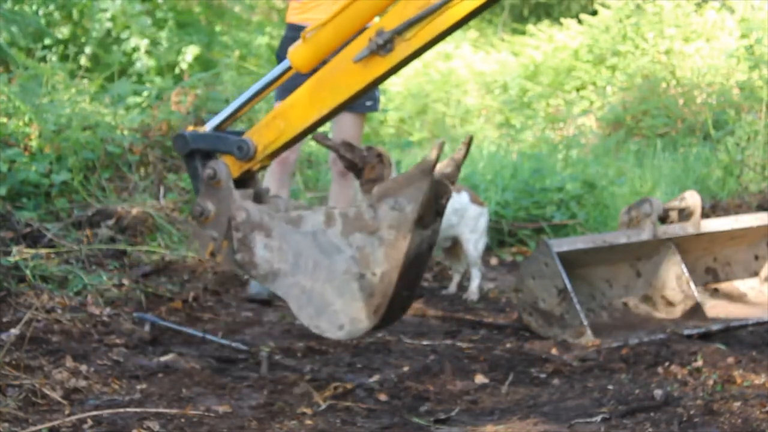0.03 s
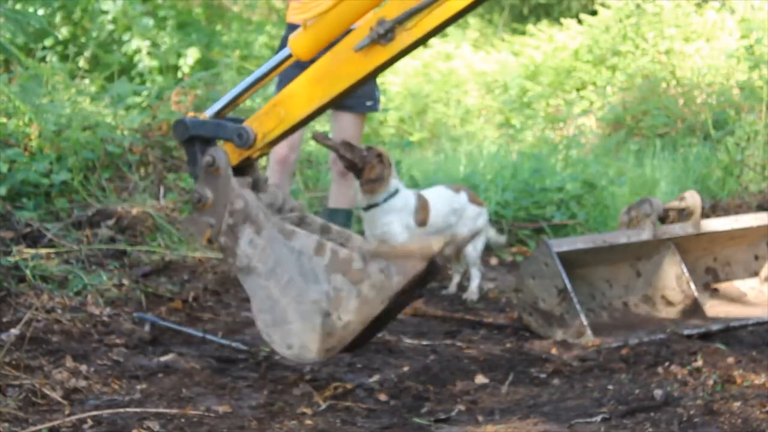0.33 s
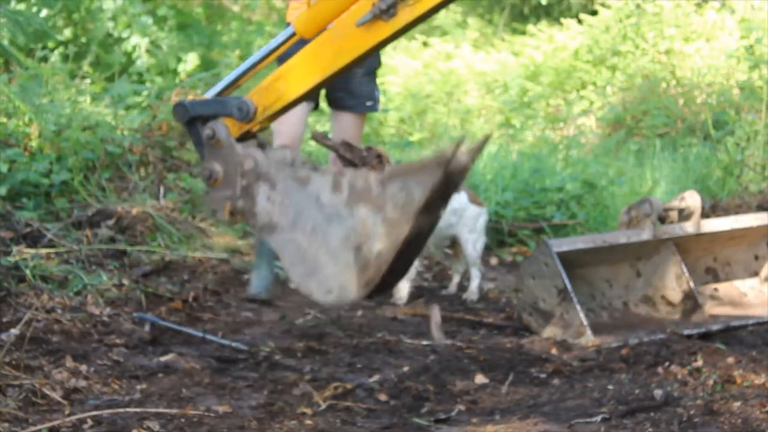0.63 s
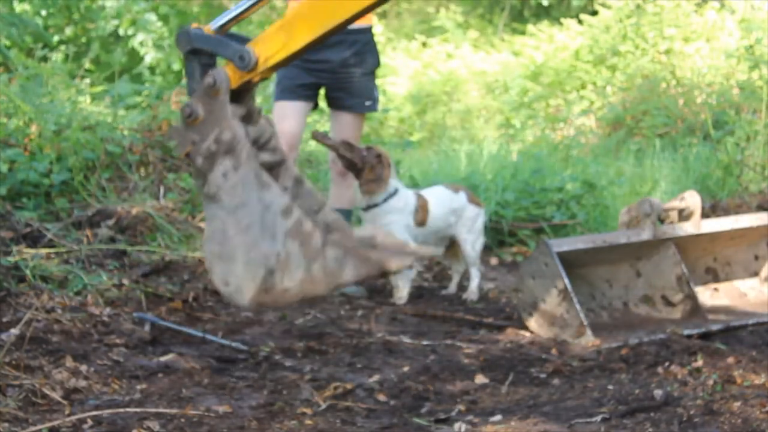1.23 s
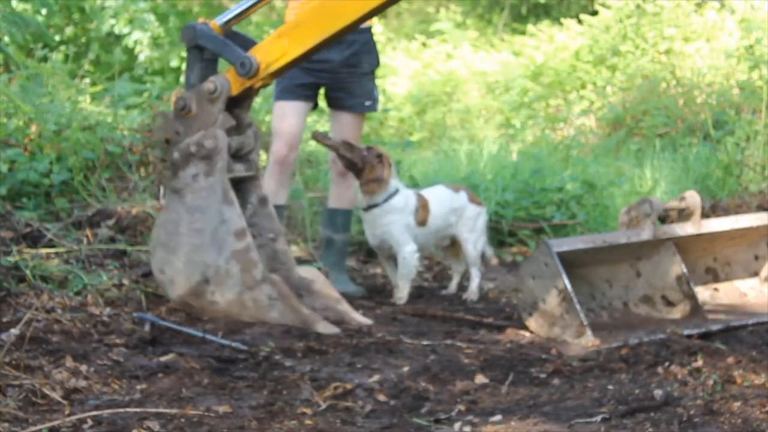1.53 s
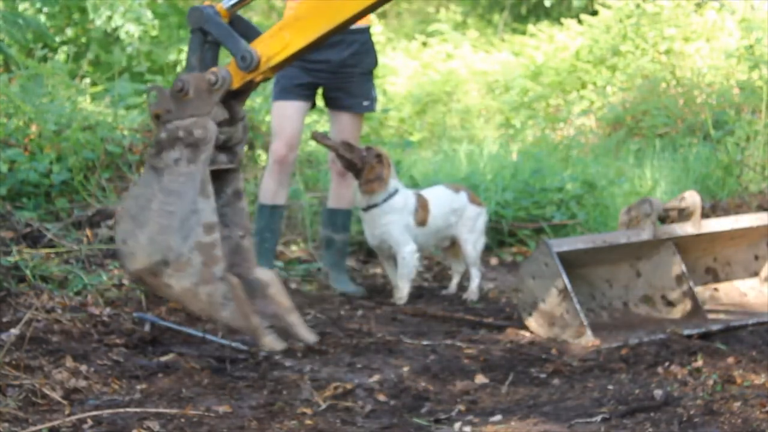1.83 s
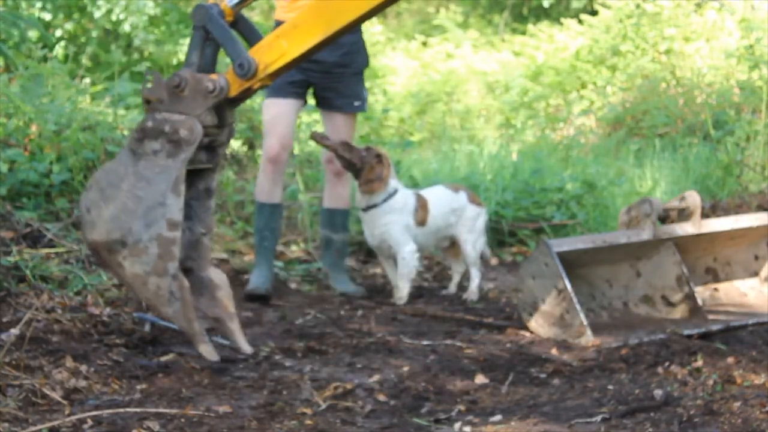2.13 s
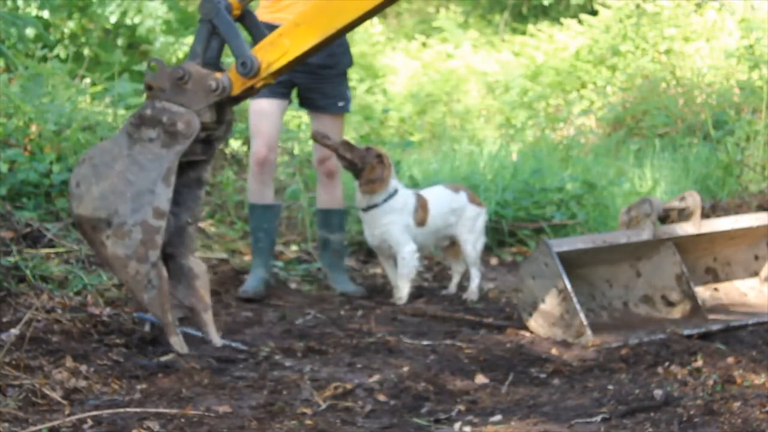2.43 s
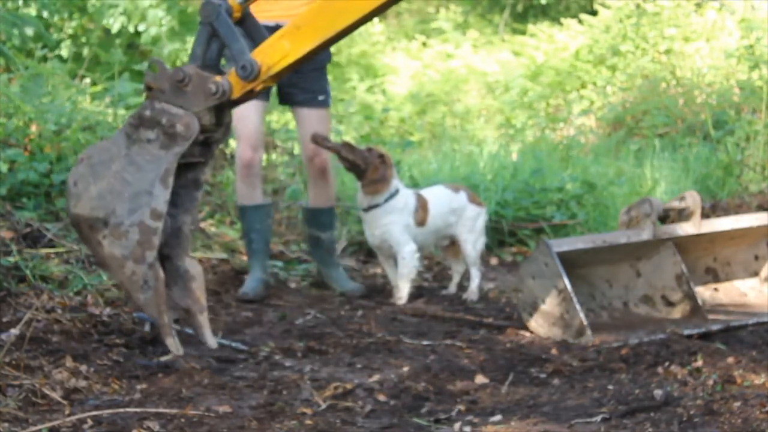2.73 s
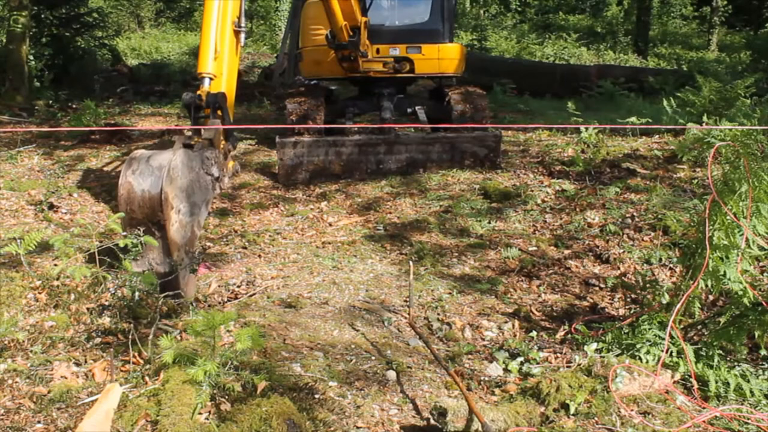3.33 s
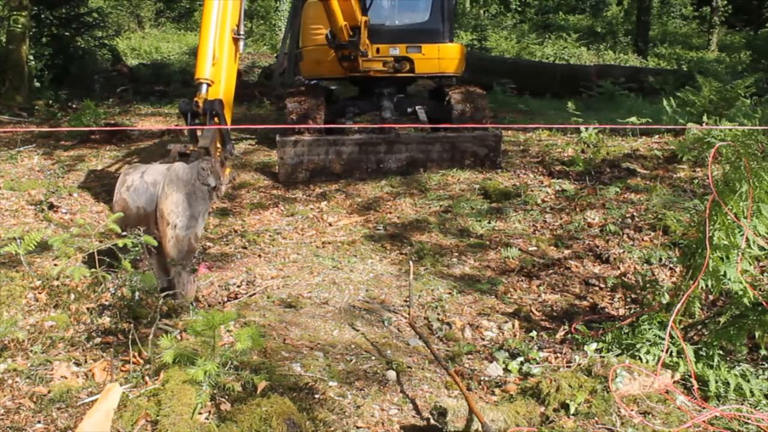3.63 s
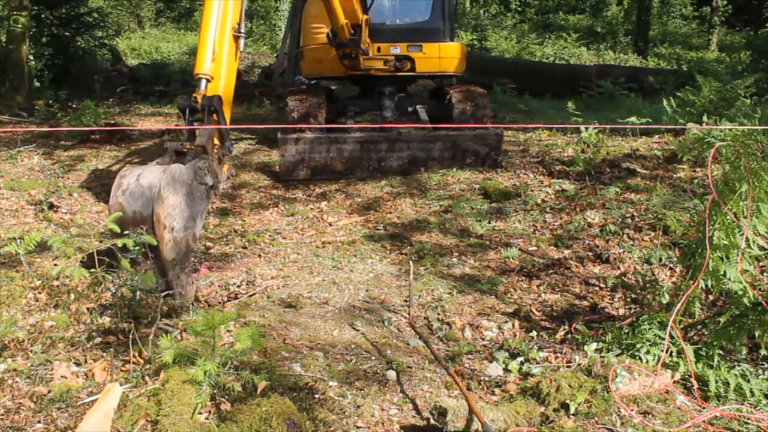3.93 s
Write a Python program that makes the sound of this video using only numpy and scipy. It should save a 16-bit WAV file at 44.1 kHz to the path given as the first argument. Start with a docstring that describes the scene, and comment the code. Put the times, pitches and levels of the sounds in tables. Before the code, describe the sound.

A steel excavator bucket clanks, rattles and rings close by for the first 1.7 seconds, with a sharp ping near 0.3 and the hardest bang near 0.5. A diesel engine idles throughout. A twig snaps around 1.9 seconds, and faint birds whistle from 2.4. Just before 3 seconds the sound dips briefly, then the engine clatters more brightly while twigs snap and dry leaves crackle until 4 seconds.

```python
"""An excavator in a wood, the microphone beside its steel bucket, the three-cylinder diesel idling throughout.
For the first second and a half or so the bucket is shaken: the joints chatter, a pin pings, the loose linkage
clanks and the shell rings. A twig snaps, and from 2.4 s small birds whistle far off. Just before 3 s the sound
dips briefly and the scene changes to the front of the machine, with brighter engine clatter and twigs and dry
leaves crackling under the bucket."""
import sys
import numpy as np
from scipy import signal
from scipy.fft import rfft, irfft, next_fast_len
from scipy.io import wavfile
from scipy.ndimage import uniform_filter1d

SR = 44100
rng = np.random.default_rng(int(sys.argv[2]) if len(sys.argv) > 2 else 0)


def master_out(mix):
    """Clip the mix to full scale and print it as 16-bit PCM to the path in sys.argv[1]."""
    frames = np.transpose(np.atleast_2d(mix))
    ceiling = np.clip(frames, -1, 1)
    pcm = np.round(ceiling * 32767).astype(np.int16)
    wavfile.write(sys.argv[1], SR, pcm)


N = 176400
T = np.arange(N) / SR

# Colour of steel striking steel. Each row: frequency in Hz, level in dB.
STEEL_CONTACT = [(120, -18.5), (300, 0.5), (700, -4), (1300, 1), (2200, -0.5), (3300, 0), (5000, -8),
                 (7000, -9), (10000, -25.5), (16000, -38)]


def amp(db):
    """Decibels to gain."""
    return 10 ** (np.asarray(db) / 20)


def unit(x):
    """Scale to rms 1."""
    return x / np.sqrt(np.mean(x ** 2) + 1e-20)


def along(points, hz):
    """Read (Hz, value) points on a log frequency axis."""
    f, v = np.transpose(points)
    return np.interp(np.log(hz + 1), np.log(f + 1), v)


def filtered(x, gain):
    """Apply a gain that depends on frequency."""
    m = next_fast_len(len(x) + 8192)
    return irfft(rfft(x, m) * gain(np.fft.rfftfreq(m, 1 / SR)), m)[:len(x)]


def shelf(hz, treble_db, corner_hz=2570):
    """Treble gain: harder contacts carry more of it."""
    return amp(treble_db * hz ** 4 / (hz ** 4 + corner_hz ** 4))


def near(hz, part_hz, octaves=0.2):
    """1 at the pitch of the struck part, 0 far from it."""
    return np.exp(-(np.log2((hz + 1) / part_hz) / octaves) ** 2)


def noise(spectrum, size, treble_db=0, partials_db=0, spacing_hz=20, part_hz=1000, part_db=0):
    """Coloured noise of rms 1, gathered into random partials and lifted around one pitch."""
    knots = partials_db * np.clip(rng.standard_normal(8192), -2.2, 2.2)
    m = next_fast_len(size)
    hz = np.fft.rfftfreq(m, 1 / SR)
    partials = np.interp(hz / spacing_hz, np.arange(len(knots)), knots)
    gain = amp(along(spectrum, hz) + partials + part_db * near(hz, part_hz)) * shelf(hz, treble_db)
    return unit(irfft(rfft(rng.standard_normal(m)) * gain, m)[:size])


def pulse(spectrum, size=8192):
    """Minimum-phase pulse with this spectrum."""
    cepstrum = irfft(np.log(amp(along(spectrum, np.fft.rfftfreq(size, 1 / SR)))))
    cepstrum[1:size // 2] *= 2
    cepstrum[size // 2:] = 0
    return irfft(np.exp(rfft(cepstrum)))


def fade(t, t60):
    """Decay by 60 dB in t60 seconds."""
    return np.exp(-np.log(1000) * t / t60)


def struck(t, t60=np.inf, attack_s=0.00024):
    """Quick rise, then a decay if t60 is given."""
    return (1 - np.exp(-(t / attack_s) ** 2)) * fade(t, t60)


def add(out, s, x):
    """Mix x into out from time s."""
    part = out[max(0, round(s * SR)):][:len(x)]
    part += x[:len(part)]


def ring(modes, t, scatter_db=2):
    """Decaying modes, a little different at each strike."""
    return sum(amp(db + scatter_db * rng.normal()) * fade(t, t60)
               * np.sin(2 * np.pi * (hz * t + rng.random())) for hz, db, t60 in modes)


def grains(per_s, t60, spread_db):
    """Envelope of many small random contacts, rms 1."""
    hits = (rng.random(N) < per_s / SR) * amp(spread_db * np.clip(rng.standard_normal(N), -2, 2))
    power = signal.fftconvolve(hits ** 2, fade(T[:SR // 10], t60) ** 2)[:N]
    return unit(np.sqrt(np.abs(power)))


def diesel(rate, firing_s, exhaust, clatter, exhaust_db, clatter_db, knock, knock_t60, rumble):
    """Each firing sends out an exhaust pulse and swells the mechanical noise; one falls at firing_s."""
    # Relative strength of each of the three cylinders in dB.
    cylinders_db = [-.6, 1.2, -.6]
    firings = np.cumsum(np.interp(T, *np.transpose(rate))) / SR
    stroke = np.floor(firings - np.interp(firing_s, T, firings)).astype(int)
    at = np.flatnonzero(np.diff(stroke)) + 1
    fire = np.zeros(N)
    fire[at] = amp(np.take(cylinders_db, stroke[at], mode="wrap") + .5 * rng.standard_normal(len(at)))
    thud = unit(signal.fftconvolve(fire, pulse(exhaust))[:N])
    t = T[:SR // 3]
    swell = unit(signal.fftconvolve(fire, np.minimum(t * 1000, 1) * fade(t, knock_t60))[:N])
    rattle = noise(clatter, N) * (1 + knock * swell)
    # rumble is the gain left well below 150 Hz
    rattle = filtered(rattle, lambda hz: rumble + (1 - rumble) * hz ** 6 / (hz ** 6 + 150 ** 6))
    return amp(exhaust_db) * thud + amp(clatter_db) * unit(rattle)


def engine_beside():
    """The idle from beside the bucket: exhaust throb over nearly even clatter."""
    # Each row: time in seconds, firing rate in Hz.
    rate = [(0, 36.53), (.6, 33.24), (.95, 34.15), (1.35, 35.81), (2.1, 34.9), (2.5, 35.98), (2.9, 37.38)]
    # Colours of the exhaust pulse and the clatter. Each row: frequency in Hz, level in dB.
    exhaust = [(20, -40), (36, -36), (52, -6), (70, 4), (106, 8), (142, 2.5), (180, -8.5), (280, -19),
               (450, -35), (900, -69)]
    clatter = [(120, 12.5), (200, -3), (253, -1.5), (554, -2), (618, -10.5), (690, -3), (923, -10),
               (1050, -9), (1300, -17), (1840, -17.5), (3070, -24.5), (7090, -34.5), (15500, -55)]
    return diesel(rate, 0.02479, exhaust, clatter, exhaust_db=-29.5, clatter_db=-31.5,
                  knock=0.087, knock_t60=0.05, rumble=0.18)


def whine(unsteady=0.6):
    """Narrow engine tones that waver in strength, heard beside the bucket."""
    # Each row: pitch in Hz, level in dB.
    tones = [(281, -50.5), (556, -40.5), (1055, -45.5)]
    waver = lambda: unit(filtered(rng.standard_normal(N), lambda hz: np.exp(-(hz / 10) ** 2)))
    return sum(amp(db) * (1 + unsteady * waver()) * np.sin(2 * np.pi * hz * T) for hz, db in tones)


def chatter(ring_db=-4, tail_t60=0.45):
    """The loose joints rattle in quick small contacts that keep the shell ringing."""
    # Each row: start and length in seconds, level and treble in dB, pitch of the loose part in Hz.
    bouts = [(0, 0.21, -30.5, -4, 584), (0.264, 0.074, -30, -7.5, 1000), (0.499, 0.055, -16.5, -0.5, 2490),
             (1.205, 0.12, -22.5, -45, 1510), (1.516, 0.05, -27, -49, 850)]
    out, t = np.zeros(N), T[:SR * 2 // 3]
    for s, length, db, treble_db, hz in bouts:
        steel = noise(STEEL_CONTACT, len(t), treble_db,
                      partials_db=5.5, spacing_hz=39.03, part_hz=hz, part_db=5)
        add(out, s, amp(db) * fade(np.maximum(t - length, 0), tail_t60) * steel)
    out *= grains(per_s=260, t60=.035, spread_db=3.5)
    ringing = unit(signal.fftconvolve(out, shell(treble_db=0))[:N])
    return out + amp(ring_db) * np.std(out) * ringing


def shell(treble_db, part_hz=1000, part_db=0, modes_db=-8.5):
    """The bucket rings: a dense wash of plate modes and a few clear ones, lifted near the part's pitch."""
    # Colour of the wash. Each row: frequency in Hz, level in dB.
    colour = [(150, -4), (300, 2.5), (600, 3), (1000, 1), (1500, 0), (2400, -4.5), (3400, -3),
              (5500, -10.5), (9000, -24), (16000, -41)]
    # Decay of the wash. Each row: frequency in Hz, t60 in seconds.
    decay = [(300, 0.4), (1500, 0.39), (4000, 0.45), (12000, 0.24)]
    # Each row: frequency in Hz, level in dB, t60 in seconds.
    clear_modes = [(278, -6, .8), (345, -2, .8), (590, -7, .7), (682, -9, .6), (1090, -8, .45),
                   (1500, -7, .4), (1662, -6, .45), (2168, -10, .6), (2460, -7, .5), (2620, -8, .55),
                   (3194, -4, .45), (12680, -31, .25), (14740, -30, .2)]
    t = T[:SR * 2 // 3]
    plate = noise(colour, len(t), treble_db / 2,
                  partials_db=5.5, spacing_hz=14, part_hz=part_hz, part_db=part_db)
    hz, s, bands = signal.stft(plate, SR, nperseg=256)
    wash = signal.istft(bands * fade(s, along(decay, hz)[:, None]), SR, nperseg=256)[1][:len(t)]
    modes = [(f, db + 20 * np.log10(shelf(f, treble_db)) + part_db * near(f, part_hz), t60)
             for f, db, t60 in clear_modes]
    return struck(t) * (wash + amp(modes_db) * ring(modes, t))


def pin(rough=0.4):
    """The struck pin pings and buzzes as it rings."""
    # Each row: start in seconds, level in dB.
    strikes = [(0, -26.5), (0.274, -17), (0.31, -32.5)]
    # Each row: frequency in Hz, level in dB, t60 in seconds.
    modes = [(4060, -12.5, 0.38), (4170, -3, 0.47), (4100, 12, 0.046), (8320, -18.5, 0.42),
             (12730, -34, 0.14)]
    out, t = np.zeros(N), T[:SR // 2]
    for s, db in strikes:
        flutter = uniform_filter1d(uniform_filter1d(rng.standard_normal(len(t)), size=160), size=100)
        buzz = 1 + rough * unit(flutter)
        add(out, s, amp(db) * struck(t) * buzz * ring(modes, t, scatter_db=4.5))
    return out


def knocks():
    """Hollow notes and small clinks, each a single resonance of the steel."""
    # Each row: start in seconds, level in dB, pitch in Hz, t60 in seconds.
    notes = [(0, -25, 587, .45), (.5, -29, 279, .8), (.757, -19, 1087, .08), (.757, -19, 1200, .07),
             (.757, -24, 2810, .08), (1.24, -20, 348, .35), (1.295, -21, 680, .2), (1.336, -15, 440, .07),
             (1.53, -22, 592, .26), (2.557, -36, 1809, .1), (2.557, -37, 3736, .04)]
    out, t = np.zeros(N), T[:SR * 2 // 3]
    for s, db, hz, t60 in notes:
        add(out, s, amp(db) * struck(t, t60) * np.sin(2 * np.pi * hz * t))
    return out


def clanks(contact_db=-7, shell_db=-12.0):
    """Each blow of the loose linkage is a short steel crash that sets the shell ringing."""
    # Each row: start in seconds, relative level, treble and shell ring in dB,
    # t60 of the crash in seconds, pitch of the struck part in Hz.
    blows = [(0.151, -20.5, -8, 6.5, 0.046, 1360), (0.174, -9, 8, -27, 0.041, 2560),
             (.247, -11, -13, 4.5, 0.16, 1320), (.264, 0, 2, -13.5, 0.045, 3060),
             (0.316, -20, -44, 6.5, 0.12, 1490), (.466, 14.5, 14.5, -10.5, 0.023, 1400),
             (.575, -11, -7, -11, 0.12, 1570), (.755, -7, -9, -5.5, 0.05, 1200),
             (0.86, -8, -11.5, -6.5, 0.071, 950), (0.944, -12, -21.5, -3.5, 0.086, 1120),
             (1.009, -19.5, -22, 10, 0.28, 1210), (1.031, 1, -5, -13.5, 0.065, 1450),
             (1.161, -10.5, -19, -2, 0.036, 1600), (1.187, -14, 12, -2.5, 0.13, 2780),
             (1.203, -0.5, -2.5, -11, 0.053, 3800), (1.25, -5, -13, 1.5, 0.021, 1790),
             (1.301, -8.5, -7.5, -9, 0.064, 2080), (1.335, -3.5, -6, -8.5, 0.083, 4460),
             (1.356, 1.5, -40, -15.5, 0.032, 1430), (1.508, -17, 10, -14, 0.062, 1520),
             (1.520, -11, -7, -4.5, 0.038, 720), (1.58, -6, -23, -11, 0.066, 1470),
             (1.642, -12.5, -8, -24, 0.099, 1600)]
    out, t = np.zeros(N), T[:SR // 6]
    for s, db, treble_db, ring_db, t60, hz in blows:
        crash = noise(STEEL_CONTACT, len(t), treble_db,
                      partials_db=2.5, spacing_hz=88.6, part_hz=hz, part_db=10)
        crack = 0.56 * struck(t, t60=0.01)  # the first instant of contact
        add(out, s, amp(db + contact_db) * crash * (struck(t, t60) + crack))
        add(out, s, amp(db + ring_db + shell_db) * shell(treble_db, hz, part_db=5))
    return out


def undergrowth():
    """Twigs snap and dry leaves crackle under the bucket."""
    # Each row: start in seconds, relative level in dB, pitch in Hz.
    twigs = [(1.889, -20.5, 3730), (3.218, -11, 1810), (3.333, -13, 2580), (3.495, -15.5, 3180),
             (3.694, -19, 3500)]
    # Each row: time in seconds, level in dB.
    leaf_levels = [(3.3, -44), (3.4, -46), (3.47, -39.5), (3.55, -48.5), (3.63, -47), (3.68, -41.5),
                   (3.76, -51), (4, -50)]
    # Each row: frequency in Hz, level in dB.
    leaf_colour = [(1500, -32), (4000, 3.5), (8000, -2.5), (13000, -14), (16000, -9)]
    level = amp(np.interp(T, *np.transpose(leaf_levels), left=-120))
    out = level * noise(leaf_colour, N) * grains(per_s=220, t60=0.033, spread_db=-2.5)
    t = T[:SR // 20]
    for s, db, hz in twigs:
        colour = [(hz / 5, -22), (hz / 2, -4), (hz, 0), (hz * 2, -15), (hz * 5, -46)]
        add(out, s, amp(db) / 2 * noise(colour, len(t)) * struck(t, t60=.018))
    return out


def birds(waver=0.135, echo_t60=.3):
    """Thin, mostly falling whistles far off, blurred by their echoes among the trees."""
    # Each row: start and length in seconds, first and last pitch in Hz, relative level in dB.
    whistles = [(2.406, 0.092, 7000, 7450, -52), (2.55, 0.13, 6100, 5400, -51),
                (2.723, 0.15, 7750, 7460, -57), (2.977, 0.089, 7700, 5130, -45),
                (3.192, 0.041, 7220, 4880, -42.5), (3.39, 0.039, 6800, 5370, -47),
                (3.563, 0.053, 7100, 5500, -48), (3.846, 0.059, 5050, 5000, -40.5)]
    out, t = np.zeros(N), T[:SR // 3]
    wobble = lambda size: unit(uniform_filter1d(rng.standard_normal(SR // 2), size=40))[:size]
    for s, length, start_hz, end_hz, db in whistles:
        progress = np.linspace(0, 1, int(length * SR))
        hz = start_hz + (end_hz - start_hz) * (progress + waver * wobble(len(progress)))
        envelope = np.sin(np.pi * progress) * (1 + wobble(len(progress)))
        add(out, s, amp(db) * envelope * np.sin(2 * np.pi * np.cumsum(hz) / SR))
    trees = rng.standard_normal(len(t)) * fade(t, echo_t60)
    echoes = signal.fftconvolve(out, trees / np.linalg.norm(trees))[:N]
    return np.sqrt(.5) * (out + echoes)


def engine_front():
    """The idle from in front: brighter clatter that beats with each firing."""
    # Each row: time in seconds, firing rate in Hz.
    rate = [(2.95, 37.26), (3.35, 37.02), (3.7, 35.27), (4, 33.33)]
    # Colours of the exhaust pulse and the clatter. Each row: frequency in Hz, level in dB.
    exhaust = [(20, -47), (36, -23), (53, -14), (72, 1.5), (108, 3), (145, 6.5), (180, -13.5), (240, -16),
               (400, -13.5), (900, -68)]
    clatter = [(120, 9.5), (200, 0.5), (263, -1.5), (327, -16), (365, -2.5), (399, -9), (497, -24.5),
               (544, -4), (842, -13), (957, -6), (1130, -6), (1400, -14), (2650, -15), (15500, -45)]
    return diesel(rate, 2.985, exhaust, clatter, exhaust_db=-27.5, clatter_db=-30.0,
                  knock=0.77, knock_t60=0.14, rumble=.2)


def scene():
    """Two scenes one after the other: beside the bucket, then, after a brief dip where the scene changes, in
    front of the machine."""
    cut_s, half_dip_s, ramp_s = 2.927, 0.0095, 0.024
    beside, front = engine_beside(), engine_front()
    engine = np.where(T < cut_s, beside + whine(), front)
    bucket = clanks() + pin() + knocks() + chatter()
    dip = np.clip((np.abs(T - cut_s) - half_dip_s) / ramp_s, .02, 1)
    return (dip * (engine + bucket + undergrowth() + birds()))[None]


def record(dry):
    """The hardest blows push the recorder's limiter down and clip; it adds hiss and limits the band."""
    limit_db, attack_s, release_db_per_s = -5.5, 0.0046, 82
    hardness, hiss_db = 2.9, -76
    low_cut_hz, top_hz = 34, 16000
    pole = np.exp(-1 / (attack_s * SR))
    smooth = lambda v: signal.lfilter([1 - pole], [1, -pole], v)
    over_db = np.maximum(10 * np.log10(smooth(dry[0] ** 2) + 1e-12) - limit_db, 0)
    held_db = np.maximum.accumulate(over_db + release_db_per_s * T) - release_db_per_s * T
    limited = dry[0] * amp(-smooth(held_db))
    clipped = limited / (1 + np.abs(limited) ** hardness) ** (1 / hardness)
    hiss = amp(hiss_db) * rng.standard_normal(N)
    band = lambda hz: (hz < top_hz) * hz ** 4 / (hz ** 4 + low_cut_hz ** 4)
    return filtered(clipped + hiss, band)[None]


dry = scene()
out = record(dry)
master_out(out)
```